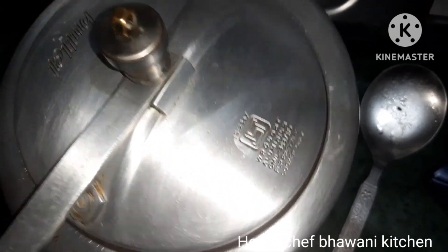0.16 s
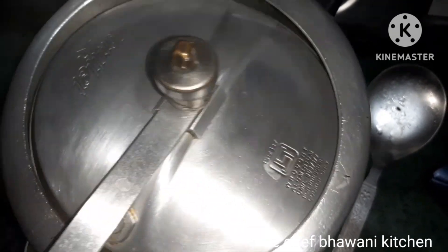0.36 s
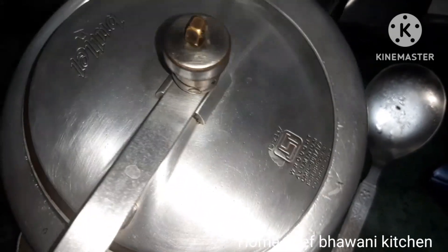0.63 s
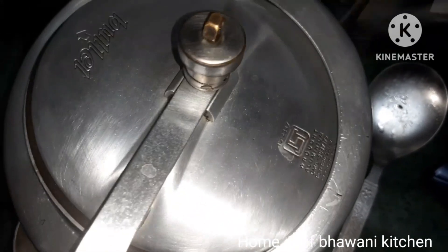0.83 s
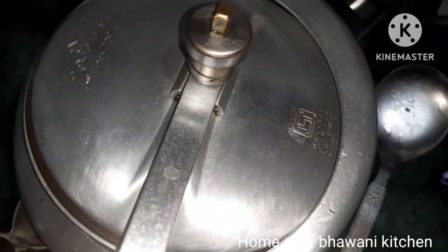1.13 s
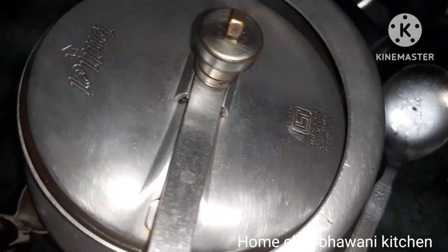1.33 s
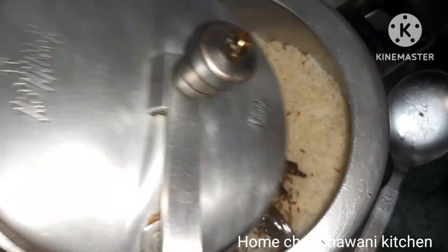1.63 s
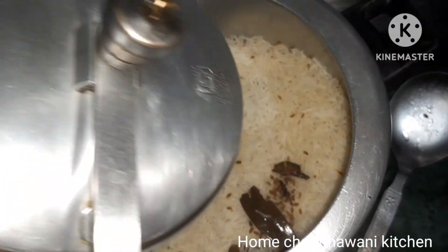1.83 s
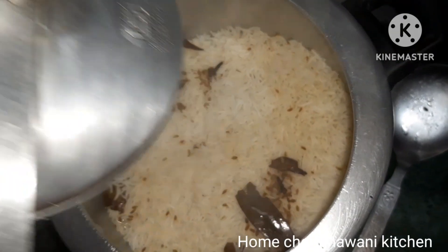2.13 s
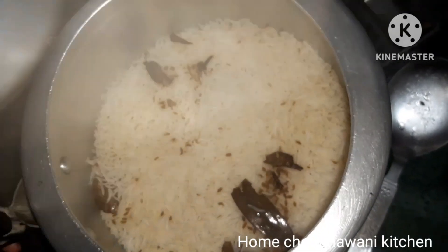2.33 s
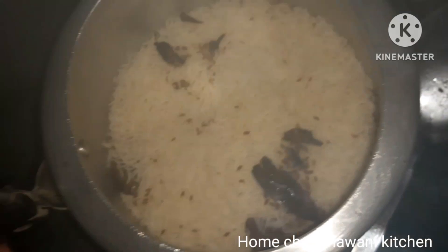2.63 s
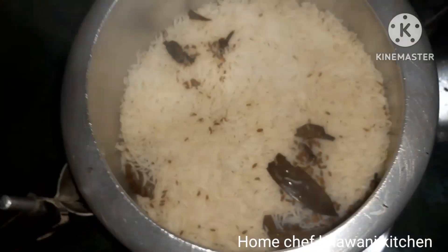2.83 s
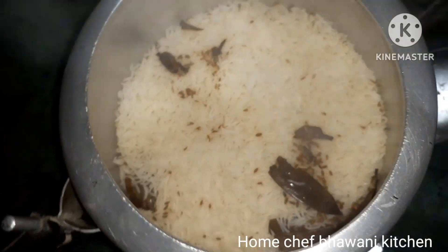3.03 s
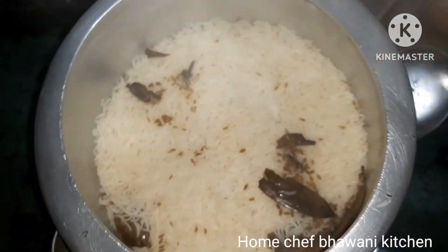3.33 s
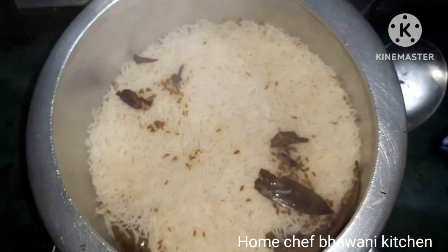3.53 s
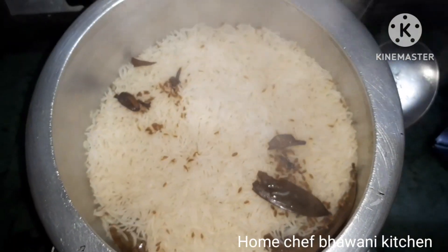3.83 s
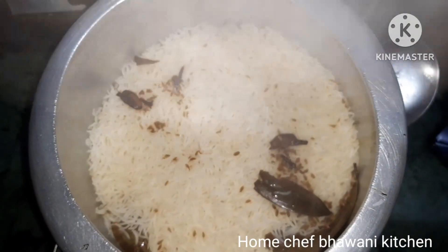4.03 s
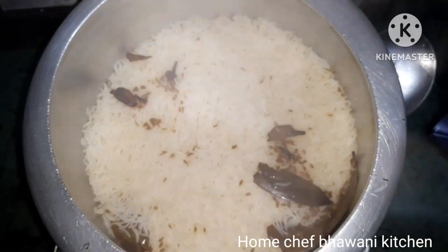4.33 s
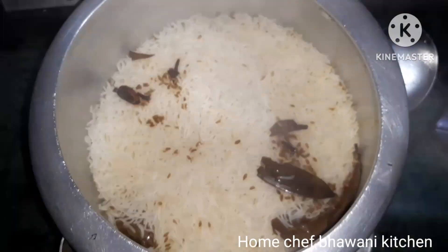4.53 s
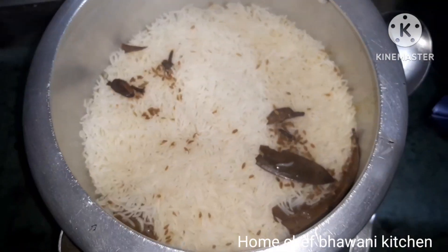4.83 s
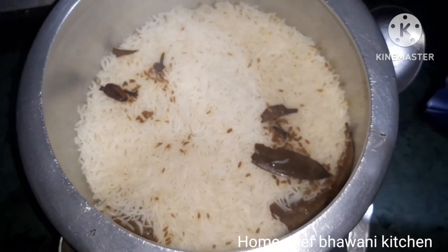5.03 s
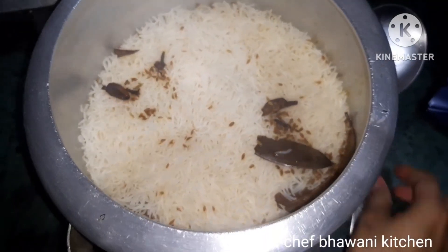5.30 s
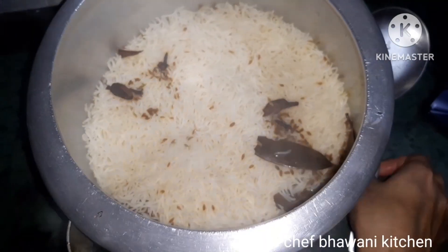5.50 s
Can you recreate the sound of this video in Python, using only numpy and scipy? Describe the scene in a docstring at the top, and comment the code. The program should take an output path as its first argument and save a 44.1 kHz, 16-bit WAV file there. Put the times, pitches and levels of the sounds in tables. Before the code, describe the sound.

Close in a small kitchen, an aluminium cooker lid is unhooked with a quick burst of hard, hollow clanks and scraping. It grinds softly along the rim with light taps, then comes free into near silence with slight touches. A brighter clatter follows as the lid lands on the counter, its loose weight rattling, and slides to rest. Faint hand rubbing and tiny squeaks end it. Close stereo microphone, louder on the left, loudest hits slightly overloaded.

```python
"""An aluminium pressure cooker is opened close by in a small kitchen, over its quiet air (steady noise).
The handle is unhooked with a burst of clanks (chattering impacts on the lid's modes) and the lid grinds
along the rim (stick-slip noise) and is lifted out. It clatters down on the counter (free-plate modes),
the loose valve weight knocking with it, and slides to rest. Last, a hand brushes the pot (swelling
friction noise) and a fingertip squeaks on it (a narrow noise band with its octave)."""
import sys
import numpy as np
from scipy import signal
from scipy.fft import rfft, irfft, next_fast_len
from scipy.io import wavfile

SR = 44100
rng = np.random.default_rng(int(sys.argv[2]) if len(sys.argv) > 2 else 0)


def transcribe(u):
    """Save the signal u as a 16-bit wav file named by the first command-line argument.

    u: samples, shape (n,) or (channels, n), limited to [-1, 1]; the rate is SR.
    q: integer samples, one column per channel.
    """
    v = np.clip(np.atleast_2d(u).T, -1, 1)
    q = np.round(v * 32767).astype(np.int16)
    wavfile.write(sys.argv[1], SR, q)


N = 249553
TIME = np.arange(N) / SR
EDGES = np.geomspace(28, 17000, 33)   # band edges [Hz]
CENTRES, WIDTHS = np.sqrt(EDGES[1:] * EDGES[:-1]), np.diff(EDGES)   # [Hz]

# Table levels are relative; t60 is the time of a 60 dB decay; spectra give only the shape of a sound.
# Spectrum of the kitchen's quiet air: (frequency [Hz], level per Hz [dB])
AIR_SPECTRUM = [(18, -42), (30, -12), (71, -13.5), (106, 1), (204, -20.5), (233, -20), (295, 4),
                (336, -12.5), (437, -7.5), (649, -10.5), (1100, -30), (1700, -21.5), (2100, -32),
                (3200, -23.5), (4200, -32.5), (16000, -35.5)]
AIR_DB = -60
# Likeness of left and right: (frequency [Hz], correlation [-1 to 1])
LIKENESS = [(60, 0.95), (280, 0.94), (550, 0.3), (1000, -0.14), (12000, 0.13)]

# Pushes of the lid along rim or counter: (start [s], length [s], grind level [dB], hiss level [dB])
STROKES = [(0.326, .09, -47, -49.5), (0.452, 0.2, -41, -38.5), (0.636, 0.07, -52, -42),
           (0.707, 0.24, -54, -57.5), (0.927, 0.67, -50.5, -58), (1.652, 0.1, -61, -65.5),
           (3.35, 0.083, -57, -57.5), (3.78, .07, -46, -39.5), (3.96, 0.21, -52.5, -55),
           (4.22, 0.054, -44.5, -47), (4.314, 0.055, -56, -49)]
STROKE_ATTACK_S, STROKE_T60_S = .03, .15   # a push takes hold, then lets go
# Hands brushing handle and pot: (middle [s], half length [s], grind level [dB], hiss level [dB])
BRUSHES = [(.2, 0.054, -60, -61.5), (2.428, 0.093, -67.5, -62.5), (2.922, .14, -65.5, -62.5),
           (4.702, .25, -77, -76.5), (5.45, 0.21, -67, -67.5), (5.65, 0.09, -62, -59)]
# Spectrum of the low grind: (frequency [Hz], level per Hz [dB])
GRIND_SPECTRUM = [(110, -55.5), (180, -22.5), (221, -17), (291, -0.5), (513, -23), (596, -16.5), (706, -8),
                  (954, -12), (1360, -51), (1500, -27.5), (1950, -64.5), (3300, -120)]
# Spectrum of the hiss: (frequency [Hz], level per Hz [dB])
HISS_SPECTRUM = [(760, -50), (1300, -9.5), (2150, -5), (2830, -9), (3200, -7.5), (4350, -22), (6030, -15),
                 (8460, -28), (15000, -30.5)]

# Echo of the kitchen: (frequency [Hz], level [dB], t60 [s])
KITCHEN_ECHO = [(200, 0.5, 0.26), (1000, -11.5, 0.41), (3000, -17, 0.13), (7000, -20.5, 0.36),
                (14000, -20, .26)]

# Short damped resonances: small contacts, and extra body or ring in some blows:
# (time [s], level [dB], pitch [Hz], width [octaves], t60 [s])
DAMPED_RESONANCES = [(.112, -56.5, 1980, .65, .22), (.172, -38, 1770, .12, 0.06),
                     (.199, -40.5, 1570, 0.43, 0.21), (0.282, -12.5, 536, 0.26, 0.087),
                     (1.462, -25.5, 514, 0.35, 0.085), (2.217, -51, 2630, .28, .033),
                     (2.711, -39, 3090, 0.64, 0.2), (2.837, -36.5, 330, 0.34, 0.11),
                     (2.907, -45.5, 2440, 0.43, .18), (2.922, -42.5, 2530, 0.34, 0.21),
                     (2.948, -43.5, 596, 1.3, 0.11), (3.118, -45.5, 2460, 1.08, 0.28),
                     (3.496, -37, 570.6, .11, 0.28), (3.618, -29, 370, 0.3, 0.12),
                     (4.214, -25, 3412, .1, 0.26), (4.357, -43.5, 1030, .12, .2),
                     (4.549, -58.5, 5500, 0.29, 0.059), (4.8, -52, 598, 2.6, 0.092),
                     (4.982, -48, 1515, 2, 0.17), (5.315, -40, 1696, 0.73, 0.16),
                     (5.318, -48.5, 603, .22, 0.27), (5.596, -45.5, 816, 0.44, .3),
                     (5.6, -50.5, 290, 0.094, 0.47)]

# Lid and handle knocking on the pot: (time [s], level [dB], body [dB], hard edge [dB], ring [dB],
# loss per rebound [dB], left minus right [dB])
UNLOCK_BLOWS = [(.246, -33, 4.5, -3.5, -6, 6.5, -4.5), (.280, -12, 6, -11.5, -10, 35, -3.5),
                (.317, -14, -4, -22, 0.5, 23, -9.5), (.406, -14.5, 1, -2.5, 0, 28, -3),
                (.467, -10, 1, 1, 0.5, 7, -8.5), (.477, -15.5, -0.5, 6, 1, 11, -2),
                (.555, -41, 13, -1, 6.5, 2.5, 0), (.583, -7.5, -5.5, -0.5, -8, 9, -4),
                (.604, -14, -10.5, 3.5, 1.5, 3, -4.5), (1.045, -42.5, 12, -1, -0.5, 24, -3),
                (1.058, -30, 4, -6.5, -2.5, 27, -5), (1.129, -41.5, 10, -6, -9, 4.5, -6.5),
                (1.251, -45.5, 10, -13, -14, 13, -7.5), (1.381, -57, 18.5, 6, 1.5, 12, -8),
                (1.404, -35.5, 4, -22, -8, 35, -4.5), (1.430, -35.5, 2, -14, -16, 35, -3),
                (1.462, -32, 11, -7.5, -0.5, 21, -10), (1.602, -37.5, 9, -8, -3, 18, -5.5)]
# The free lid meeting the counter: (time [s], level [dB], body [dB], hard edge [dB], ring [dB],
# loss per rebound [dB], left minus right [dB])
COUNTER_BLOWS = [(3.224, -13, 0, 1.5, 0.5, 15.5, -4.5), (3.263, -13.5, 1.5, 1.5, 2, 4.5, -3.5),
                 (3.498, -30.5, -1.5, -12.5, -10.5, 21, -4.5), (3.586, -14, -1.5, -1.5, -2.5, 8, -4.5),
                 (3.647, -14, -3, -11, -9.5, 18, -3), (3.751, -34.5, 2, -10, -5, 0.5, -5),
                 (3.842, -17.5, -6.5, -0.5, -15, 15, 0.5), (3.853, -13.5, -0.5, 2, 0.5, 5.5, -2.5),
                 (3.953, -20.5, -2, -9, -12.5, 12, -3.5), (4.063, -39.5, -6, -24, -25, 3, -5),
                 (4.213, -30, -9, 14, -17, 14, -5), (4.239, -27.5, -3, 7, -8.5, 17, -2.5)]
REBOUND_S = .011   # time between one touch and the next as the plate chatters
HELD_T60_S, FREE_T60_S = .12, .17   # clatter decay with the lid in the pot and out of it
LIES_FLAT_S = 3.4   # from here on the counter damps the first of the free lid's modes

# Close upper modes of the held lid: (frequency [Hz], level per Hz [dB])
HELD_COLOUR = [(88, -67.5), (150, -34.5), (297, -5.5), (431, -19.5), (790, -8.5), (888, -5), (1260, -24),
               (1760, -10), (2550, -16), (2810, -22), (3620, -18.5), (4410, -27.5), (5680, -21),
               (7470, -29), (8900, -43.5), (13400, -39.5), (16000, -59.5)]
# Close upper modes of the free lid: (frequency [Hz], level per Hz [dB])
FREE_COLOUR = [(88, -54.5), (150, -25.5), (231, -7), (414, -11), (941, -1.5), (1020, -4), (1500, -9),
               (2600, -2.5), (3220, -25.5), (3550, -0.5), (3840, -13.5), (4760, -15), (6390, -14.5),
               (6910, -20), (8400, -27.5), (12900, -27.5), (16000, -41.5)]
# Strong modes of the lid held in the pot: (frequency [Hz], level [dB], t60 [s])
HELD_MODES = [(277, -13, .22), (296, -5.5, .22), (572, -17, .2), (728, -18, .18), (770, -12, .2),
              (1364, -21, .2), (1564, -19, .19), (1917, -14, .15), (2490, -19, .19), (2590, -17, .18),
              (4145, -26, .25), (232, -18, .2), (835, -19, .2), (940, -21, .2), (1790, -21, .18),
              (2300, -22, .2), (2837, -22, .18), (3660, -25, .22), (5560, -28, .14), (7300, -32, .13)]
# Strong modes of the free lid: (frequency [Hz], level [dB], t60 [s])
FREE_MODES = [(233, -13.5, .32), (288, -13, .25), (572, -20, .16), (830, -15, .13), (1012, -18, .17),
              (1141, -17, .2), (2439, -18, .15), (2595, -16, .2), (2875, -15, .2), (3524, -8, .14),
              (3650, -14, .14), (4649, -19, .16), (2019, -19, .15), (2200, -19, .15), (4200, -23, .17),
              (4980, -24, .17), (5265, -25, .16), (5510, -23, .15), (5986, -26, .15), (6780, -28, .16),
              (7700, -30, .17), (10800, -32, .15), (13200, -32, .15)]

# Pushes that set the lid's lowest mode humming: (time [s], level [dB], push length [s])
FLEX_PUSHES = [(0.282, -19.5, 0.046), (0.594, -33.5, 0.068), (0.91, -45.5, 0.056), (0.986, -31.5, 0.051),
               (1.4, -45.5, 0.099), (2.3, -55.5, 0.051), (2.837, -58, 0.031), (3.247, -36.5, 0.012),
               (3.501, -35.5, 0.017), (3.597, -33.5, 0.045), (3.832, -28.5, 0.045), (4.22, -49.5, 0.04),
               (5.459, -46, 0.032)]
FLEX_HZ, FLEX_T60_S = 112, .48

# Landings that jiggle the loose valve weight on its stem: (time [s], level [dB])
VALVE_KNOCKS = [(3.497, -33.5), (3.586, -16), (3.645, -20.5), (3.855, -20.5)]
# Modes of the valve weight: (frequency [Hz], level [dB], t60 [s])
VALVE_MODES = [(2600, -7, .13), (4649, -5, .14), (4735, -12, .12), (6050, -17, .12)]

# Squeaks of a fingertip on the pot: (middle [s], level [dB], half length [s])
SQUEAKS = [(5.506, -55, 0.0069), (5.541, -46, 0.0085), (5.595, -58.5, 0.017)]
SQUEAK_HZ = 6120

CUTOFF_HZ = 15700


def from_db(db):
    """Decibels are a logarithm of amplitude; return the gain."""
    return 10 ** (np.asarray(db) / 20)


def fall(seconds, t60):
    """Free damped decay is exponential: amplitude falls by 60 dB in t60."""
    return np.exp(-np.log(1000) * seconds / max(t60, 1e-3))


def rms_one(x):
    """Mean power sets the level: scale a signal to rms 1."""
    return x / np.sqrt(np.mean(x ** 2) + 1e-20)


def at_hz(points, hz, axis=1):
    """Spectra are read by ratio: interpolate a column on a log-frequency axis."""
    points = np.array(points)
    return np.interp(np.log(hz), np.log(points[:, 0]), points[:, axis])


def band_shares(spectrum):
    """Band power is density times bandwidth; nothing lies beyond the ends of the spectrum."""
    inside = (CENTRES > spectrum[0][0]) & (CENTRES < spectrum[-1][0])
    power = from_db(at_hz(spectrum, CENTRES)) ** 2 * WIDTHS * inside
    return power / power.sum()


def sides(pan_db):
    """A level difference places a source: left and right gains at constant total power."""
    balance = from_db(np.array([pan_db, -pan_db]) / 2)
    return balance / np.sqrt(np.cosh(pan_db * np.log(10) / 10))


def linger(power, t60):
    """Energy storage: power is held and given back exponentially."""
    r = fall(1 / SR, t60) ** 2
    return signal.lfilter([1 - r], [1, -r], power + 1e-20)


def add_air(power):
    """Background noise is stationary: constant power in every band."""
    level = from_db(AIR_DB) ** 2
    power += (level * np.outer(band_shares(AIR_SPECTRUM), sides(-9.0) ** 2))[:, :, None]


def crowded_noise(ripple_db=3.0, spacing_hz=40):
    """Close resonances roughen a spectrum: four noises share one uneven comb."""
    size = next_fast_len(N)
    hz = np.arange(size // 2 + 1) * SR / size
    heights = rng.standard_normal(4096)
    ripple = np.interp(hz / spacing_hz, np.arange(len(heights)), heights)
    comb = from_db(ripple_db * ripple * hz / (hz + 500))
    noises = rfft(rng.standard_normal((2, 2, size)))
    return irfft(noises * comb, size)[..., :N]


def dense_field(power):
    """Statistical acoustics: countless modes and reflections sum to noise of given band power."""
    out, crowd = np.zeros((2, N)), crowded_noise()
    for k, hz in enumerate(CENTRES):   # power is bands x channels x time
        band = signal.butter(2, EDGES[k:k + 2], "band", fs=SR, output="sos")
        mid, side = signal.sosfilt(band, crowd[k % 2])
        alike = np.clip(at_hz(LIKENESS, hz), -1, 1)
        pair = np.sqrt(1 + alike) * mid + np.sqrt(1 - alike) * side * [[1], [-1]]
        r = np.exp(-8 * hz / SR)   # a band needs part of a cycle to build up
        swell = signal.lfilter([(1 - r) ** 2], [1, -2 * r, r * r], np.sqrt(power[k]))
        out += swell * rms_one(pair)
    return out


def friction():
    """Friction follows the drive: pushes rise, hold and let go; brushes swell and fade."""
    shapes = []
    for start, length, *_ in STROKES:
        attack = np.clip((TIME - start) / STROKE_ATTACK_S, 0, 1)
        shapes.append(attack * fall(np.maximum(TIME - start - length, 0), STROKE_T60_S))
    for middle, half, *_ in BRUSHES:
        shapes.append(np.exp(-.5 * ((TIME - middle) / half) ** 2))
    strengths = from_db(np.array(STROKES + BRUSHES)[:, 2:].T)   # grind, hiss
    return np.sqrt(strengths ** 2 @ (np.array(shapes) + 1e-9) ** 2)


def add_sliding(power, slips_per_s=90, spread_db=4.5, slip_t60=.05):
    """Stick-slip friction: contact breaks away in random jerks of uneven strength."""
    grind, hiss = friction()
    breaks_away = rng.random(N) < slips_per_s / SR
    jerk_db = spread_db * np.minimum(rng.exponential(1, N), 3)
    grain = linger(breaks_away * from_db(jerk_db) ** 2, slip_t60)
    grain = .5 + .5 * grain / grain.mean()   # half steady, half jerky
    for spectrum, level in ((GRIND_SPECTRUM, grind), (HISS_SPECTRUM, hiss)):
        power += np.outer(band_shares(spectrum), grain * level ** 2)[:, None]


def add_kitchen(power):
    """Reverberation: the walls hand part of every band back as a decaying tail."""
    for k, hz in enumerate(CENTRES):
        gain, t60 = from_db(at_hz(KITCHEN_ECHO, hz)), at_hz(KITCHEN_ECHO, hz, axis=2)
        power[k] += gain ** 2 * linger(power[k].mean(axis=0), t60)


def add_decay(power, s, strength, t60, pan_db):
    """Impulsive excitation: bands are filled at one instant and die together."""
    at = round(s * SR)
    decay = fall(TIME[:min(SR // 3, N - at)], t60) ** 2
    power[:, :, at:at + len(decay)] += np.outer(strength, sides(pan_db) ** 2)[:, :, None] * decay


def add_damped_resonances(power, skirt=4.8, pan_db=-6.5):
    """Damping broadens resonance: each is a single spectral hump that dies away."""
    for s, db, hz, octaves, t60 in DAMPED_RESONANCES:
        hump = (1 + (np.log2(CENTRES / hz) / octaves) ** 2 / 2) ** -skirt
        add_decay(power, s, from_db(db) ** 2 * hump / hump.sum(), t60, pan_db)


def chatter(blows, t60, count=4):
    """Inelastic rebound: each blow is a quick run of touches, each weaker by the loss."""
    touches = []
    for s, db, body_db, edge_db, ring_db, loss_db, pan_db in blows:
        for k in range(count):
            touch_db = db - k * max(loss_db, 0)
            touches.append((s + k * REBOUND_S, touch_db, body_db, edge_db, ring_db, t60, pan_db))
    return touches


def contact_gain(blow, hz, body_hz=750, middle_hz=1700, upper_hz=3600, edge_hz=7000):
    """Contact stiffness shapes excitation: heavy contacts feed low modes, hard ones high modes."""
    s, level_db, body_db, edge_db, *_ = blow
    tilt = [(body_hz, body_db), (middle_hz, 0), (upper_hz, 0), (edge_hz, edge_db)]
    return from_db(level_db + at_hz(tilt, hz))


def add_clatter(power, blows, colour, level_db):
    """High modal density: each blow sets off all the plate's close modes as decaying noise."""
    for blow in blows:
        s, *_, t60, pan_db = blow
        gain = from_db(level_db) * contact_gain(blow, CENTRES)
        add_decay(power, s, band_shares(colour) * gain ** 2, t60, pan_db)


def cracks(blows, level_db=-3.5, t60=0.024, low_hz=600, bright_hz=4000, lag_s=0.00035):
    """Direct sound: each contact sends a short burst that reaches the right side later."""
    out, age = np.zeros((2, N)), TIME[:SR // 40]
    for s, blow_db, body_db, edge_db, *_, pan_db in blows:
        top_hz = np.clip(bright_hz * from_db(edge_db / 2), 1500, 12000)   # harder is brighter
        band = signal.butter(3, [low_hz, top_hz], "band", fs=SR, output="sos")
        burst = signal.sosfilt(band, rng.standard_normal(len(age)) * fall(age, t60))
        burst = burst * from_db(blow_db + level_db) * np.sqrt(SR / 2 / top_hz)
        for channel, at in enumerate((round(s * SR), round((s + lag_s) * SR))):
            out[channel, at:at + len(age)] += sides(pan_db)[channel] * burst
    return out


def ringing(blows, modes, level_db, spread_db=2.5, lead_rad=1.5, shade_hz=1000, detune=0.0021):
    """Modal superposition: each blow excites damped modes with its own strengths and phases."""
    out, (hz, mode_db, t60) = np.zeros((2, N)), np.transpose(modes)
    age = TIME[:SR // 2]
    rings = []
    for f, t in zip(hz, t60):
        build_up = 1 - np.exp(-(f * age) ** 2)   # over about one cycle
        rings.append(build_up * fall(age, t) * np.exp(2j * np.pi * f * age))
    rings = np.array(rings)
    # the left side is nearer, so it leads in phase
    lead = np.array([np.exp(1j * lead_rad * hz / (hz + shade_hz)), np.ones(len(hz))])
    for blow in blows:
        s, *_, ring_db, clatter_t60, pan_db = blow
        at = round(s * SR)
        uneven_db = spread_db * rng.standard_normal(len(hz))
        strength = contact_gain(blow, hz) * from_db(level_db + ring_db + mode_db + uneven_db)
        phase = np.exp(2j * np.pi * rng.random(len(hz)))
        shade = sides(pan_db * hz / (hz + shade_hz))   # long waves reach both sides nearly alike
        sound = ((shade * lead * strength * phase) @ rings).real
        pinch = 1 + detune * rng.standard_normal()   # the way the metal is pressed shifts its pitch
        sound = np.array([np.interp(age * pinch, age, channel) for channel in sound])
        out[:, at:at + len(age)] += sound[:, :N - at]
    return out


def flexing(pan_db=-4.5):
    """Forced, then free vibration: the lowest mode swells under each push and dies away."""
    swing_power = np.zeros(N)
    for s, db, push in FLEX_PUSHES:
        age = np.maximum(TIME - s, 0)
        release = fall(np.maximum(age - push, 0), FLEX_T60_S)
        swing_power += (from_db(db) * np.minimum(age / push, 1) * release) ** 2
    hum = np.sqrt(swing_power) * np.sin(2 * np.pi * FLEX_HZ * TIME)
    return sides(pan_db)[:, None] * hum


def rubbed_ring(modes, start, end, level_db, width_hz=45, split_hz=1300):
    """Resonance under random drive: sliding keeps the lid's modes singing faintly."""
    grind, hiss = friction()
    hz = np.arange(N // 2 + 1) * SR / N
    peaks = sum(from_db(db) / (1 + ((hz - f) / width_hz * 2) ** 2) for f, db, t60 in modes)
    drive = rfft(rng.standard_normal((2, N))) * peaks
    low = rms_one(irfft(drive * (hz > 400) * (hz < split_hz), N))
    high = rms_one(irfft(drive * (hz > split_hz), N))
    touching = np.clip(np.minimum(TIME - start, end - TIME) / 0.058, 0, 1)   # 58 ms fades
    return from_db(level_db) * touching * (low * grind + high * hiss)


def valve_weight(pan_db=-2.0):
    """Coupled impact: a landing jiggles the loose weight, which knocks once on its own modes."""
    knocks = [(s, db, 0, 0, 0, 0, pan_db) for s, db in VALVE_KNOCKS]
    return ringing(knocks, VALVE_MODES, level_db=1.5)


def squeak(width_hz=260, pan_db=-10.0, octave_db=-12.5):
    """Skin stick-slip makes a thin, unsteady whistle; squaring it yields its octave."""
    edges = [SQUEAK_HZ - width_hz / 2, SQUEAK_HZ + width_hz / 2]
    band = signal.butter(2, edges, "band", fs=SR, output="sos")
    level = sum(from_db(db) * np.exp(-.5 * ((TIME - s) / half) ** 2) for s, db, half in SQUEAKS)
    whistle = rms_one(signal.sosfilt(band, rng.standard_normal((2, N))))
    octave = rms_one(np.gradient(whistle ** 2, axis=1))
    return sides(pan_db)[:, None] * level * (whistle + from_db(octave_db) * octave)


def scene():
    """Superposition: noise-like powers share one dense field, and distinct sounds are added to it."""
    held, free = chatter(UNLOCK_BLOWS, HELD_T60_S), chatter(COUNTER_BLOWS, FREE_T60_S)
    power = np.zeros((len(CENTRES), 2, N), np.float32)
    add_clatter(power, held, HELD_COLOUR, level_db=0.7)
    add_clatter(power, free, FREE_COLOUR, level_db=-1.5)
    add_damped_resonances(power)
    add_sliding(power)
    add_kitchen(power)
    add_air(power)   # after the echo, so the air gets none

    landing = [blow for blow in free if blow[0] < LIES_FLAT_S]
    flat = [blow for blow in free if blow[0] >= LIES_FLAT_S]
    rings = ringing(held, HELD_MODES, level_db=1.0)
    rings += ringing(landing, FREE_MODES, level_db=3.0)
    rings += ringing(flat, FREE_MODES[1:], level_db=3.0)
    valve = valve_weight()
    rubbed = rubbed_ring(HELD_MODES, 0.66, 1.85, level_db=-8.5)
    rubbed += rubbed_ring(FREE_MODES, 4.0, 4.44, level_db=-2.5)
    return dense_field(power) + rings + valve + rubbed + cracks(held + free) + flexing() + squeak()


def record(dry):
    """Overload and band limiting: the highest peaks are clipped, then the top is cut."""
    loud = np.clip(dry, -.92, .92)
    return signal.sosfilt(signal.ellip(10, .1, 80, CUTOFF_HZ, fs=SR, output="sos"), loud)


dry = scene()
out = record(dry)
transcribe(out)
```